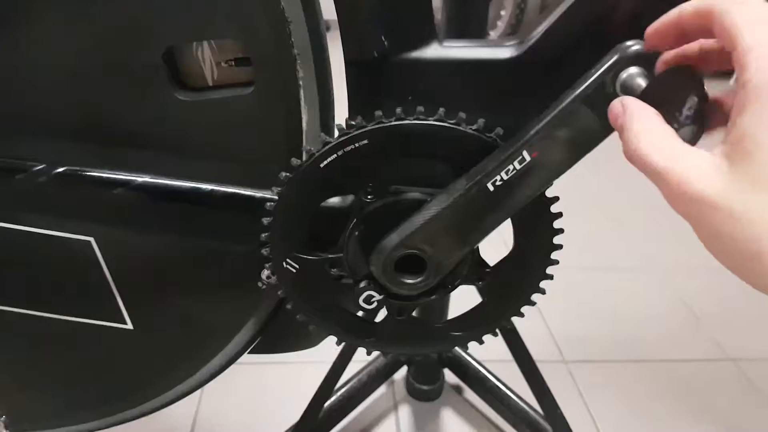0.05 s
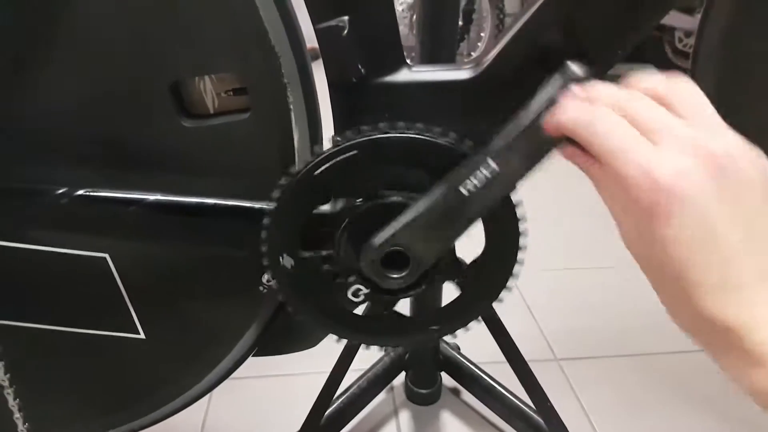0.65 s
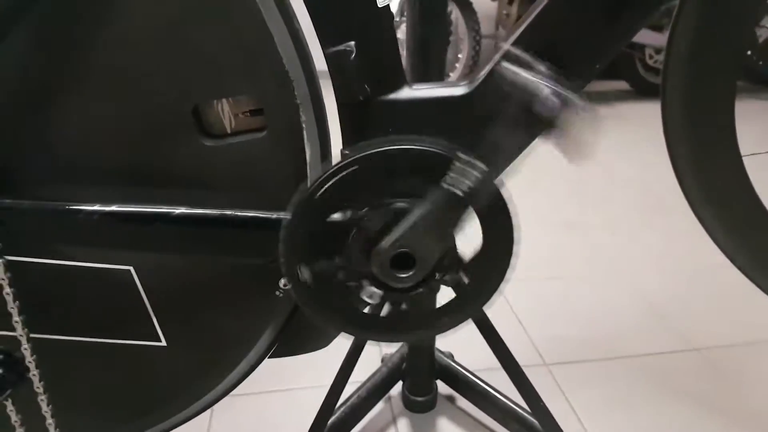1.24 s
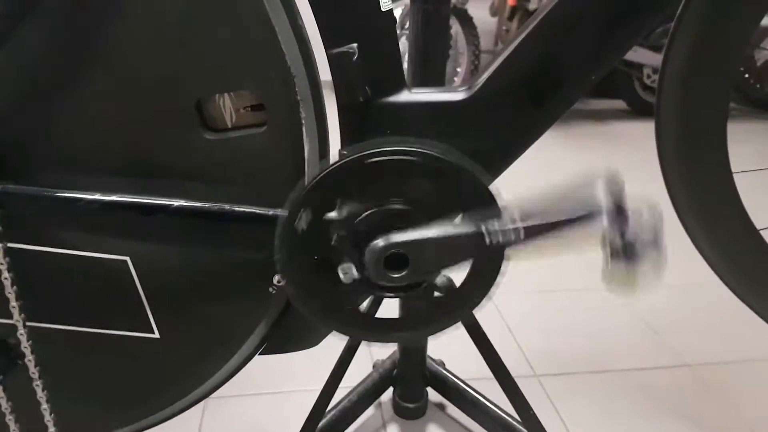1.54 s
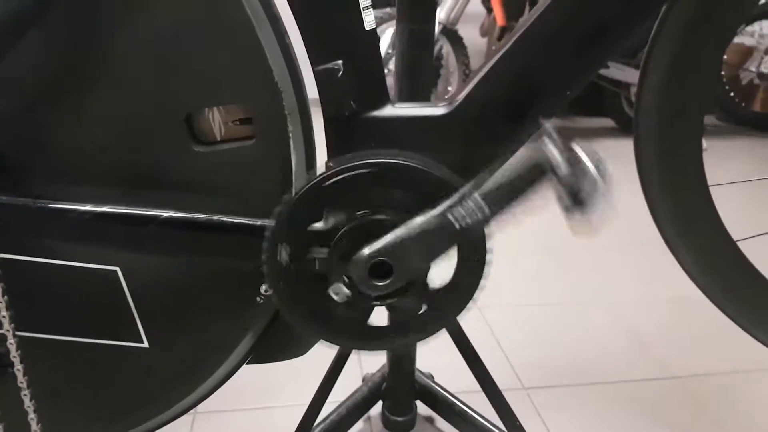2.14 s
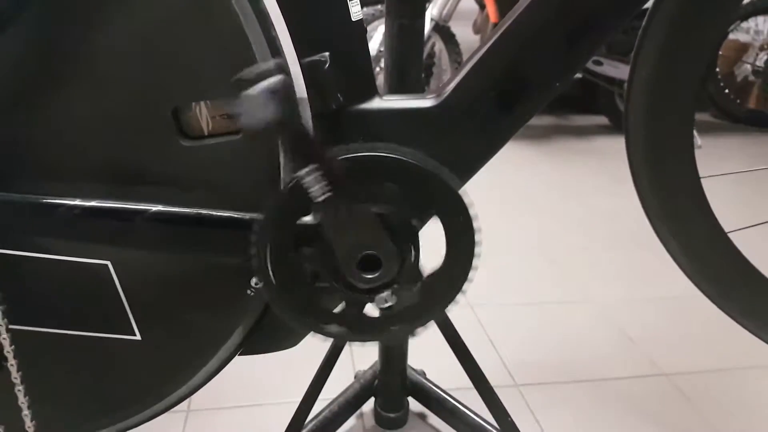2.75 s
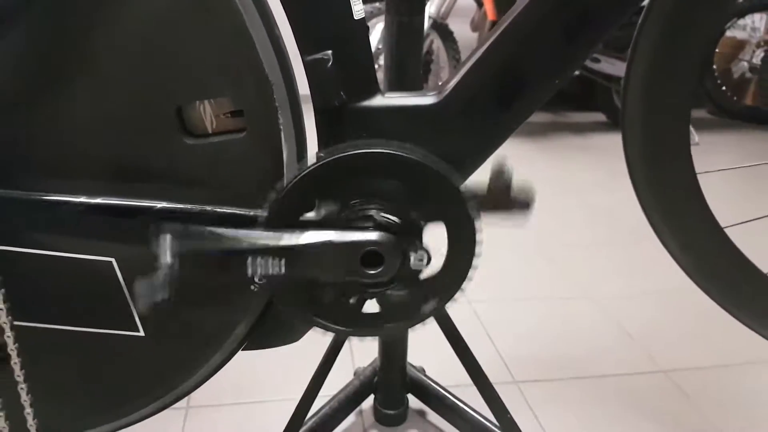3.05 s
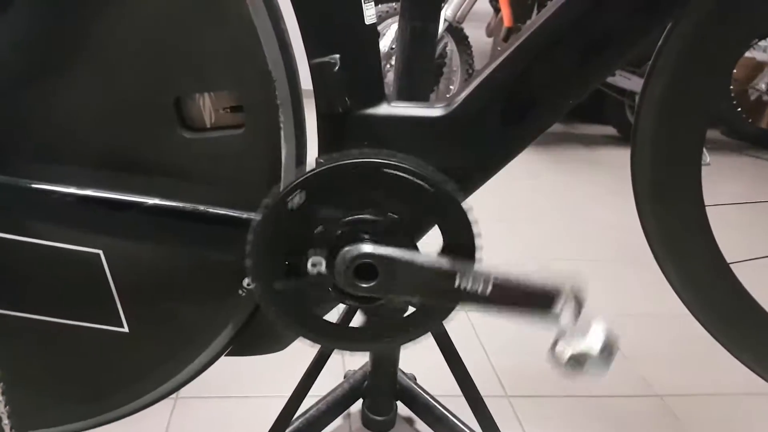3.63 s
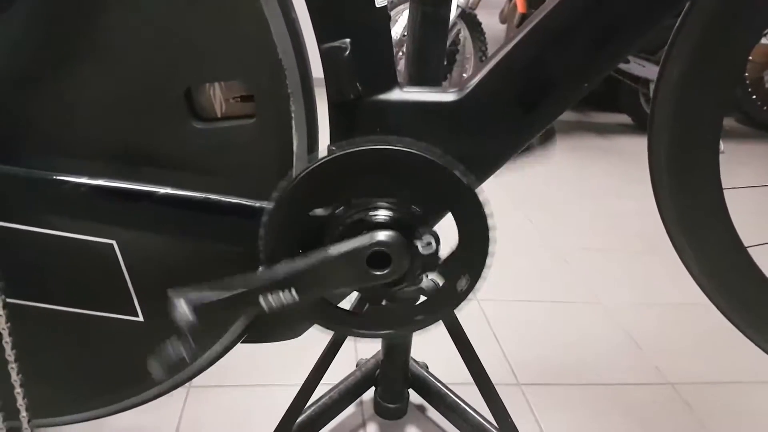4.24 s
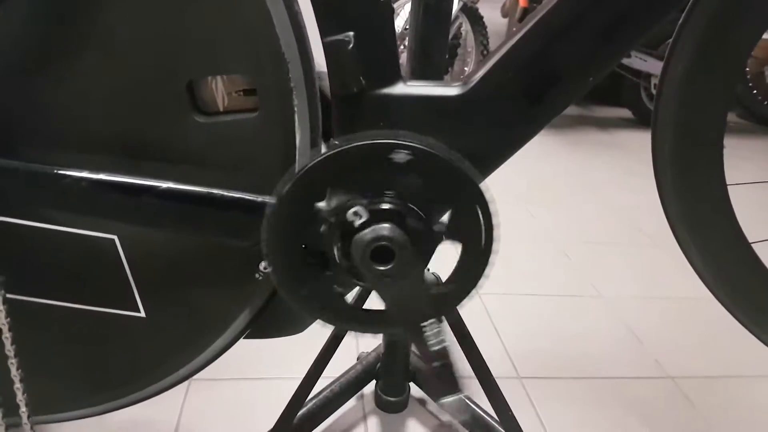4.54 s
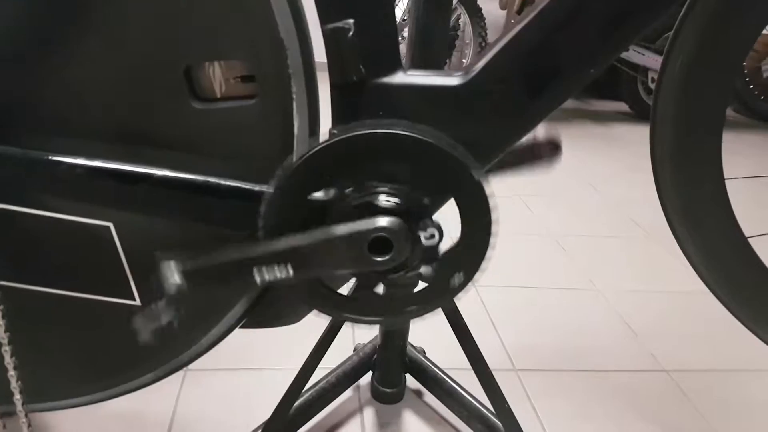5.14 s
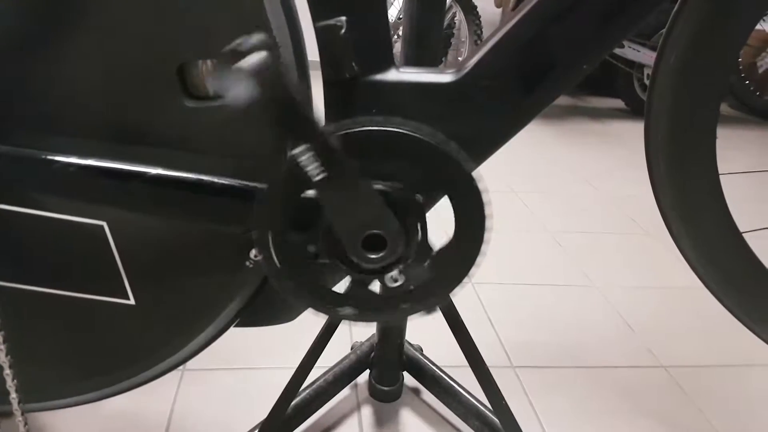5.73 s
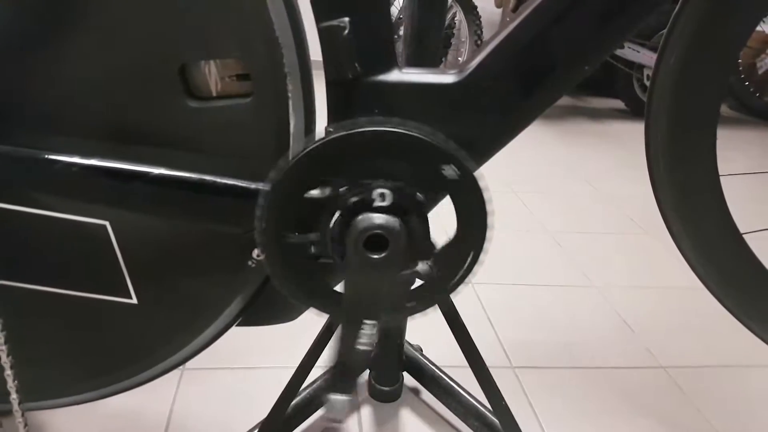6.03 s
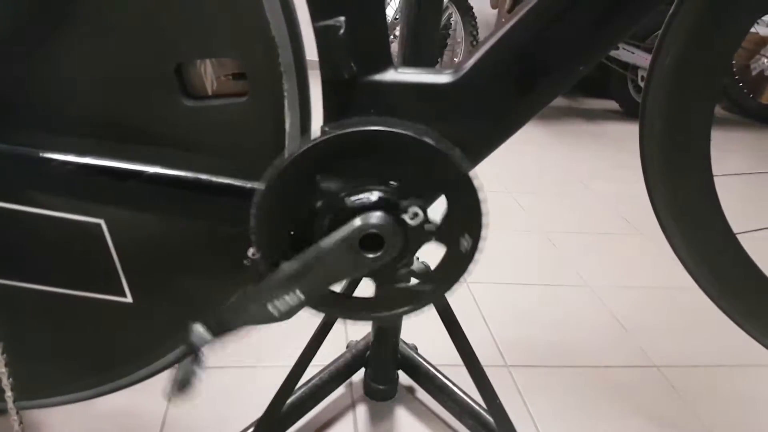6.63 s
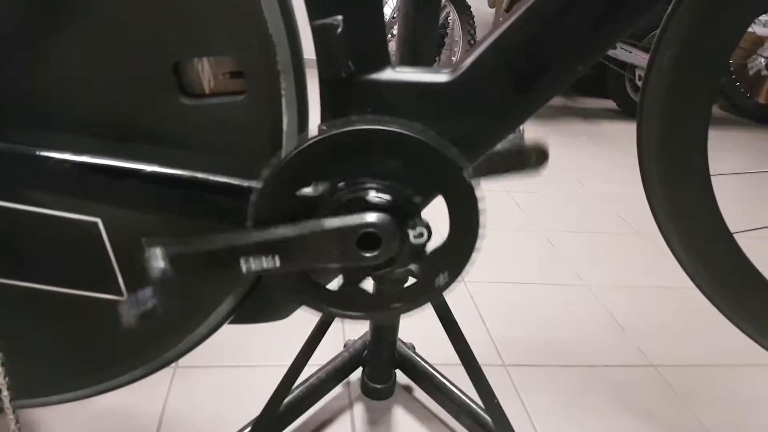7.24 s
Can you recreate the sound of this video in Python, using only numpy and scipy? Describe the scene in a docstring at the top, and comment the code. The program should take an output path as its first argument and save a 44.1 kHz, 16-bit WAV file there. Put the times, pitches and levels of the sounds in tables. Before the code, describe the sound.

After loud finger thumps on the microphone, a bicycle chain ticks, slaps and clatters as the crank coasts down to a gentle whirr.

```python
"""A bicycle chain runs on a stand in a tiled room: a hand flicks the crank, which spins on and slows.
Rollers tick over the teeth; the slack chain knocks, slaps and chatters about once a turn, and now and
then its links clack hard onto the teeth and ring the frame. Then it settles to a soft, swelling whirr.
A finger bumps the phone's right microphone port. Underneath lie mains hum, low rumble and faint hiss,
with a brief wash of noise at the start."""
import sys
import numpy as np
from scipy import signal
from scipy.fft import rfft, irfft
from scipy.io import wavfile
from scipy.ndimage import uniform_filter1d

SR = 44100
rng = np.random.default_rng(int(sys.argv[2]) if len(sys.argv) > 2 else 0)


def persist_wave(psi):
    """Save psi, clipped to +-1, as 16-bit WAV."""
    counts = np.round(np.clip(psi, -1, 1) * 32767).astype(np.int16)
    wavfile.write(sys.argv[1], SR, np.atleast_2d(counts).T)


N = 325458
T = np.arange(N) / SR
OPEN_S = .1  # the phone's input opens
RELEASE_S, TURNS_PER_S, HALF_SPEED_S = .85, 3.75, 5.556  # crank let go: when, how fast, time to halve


# tone of the running chain (frequency [Hz], level [dB])
RUN_EQ = [(100, -31), (160, -9.5), (250, 2.5), (400, -10), (650, 0), (900, -1.5), (1250, 2), (2000, -9.5),
          (2600, -5.5), (3500, -19), (6000, -25), (9000, -28.5), (15000, -33)]
# peaks in the tone of running chain, knocks and rattles (frequency [Hz], width [Hz], boost [dB])
SHARED_PEAKS = [(468, 31, 5.9), (743, 33, 3), (1020, 89, 2.5), (1216, 36, 2.64), (1450, 9.2, 1.6),
                (1710, 240, 6), (2050, 290, 5.4), (2650, 52, 3.3)]
# jolts that stir up the chain (time [s], level [dB], decay [s])
JOLT_CUES = [(.85, -49.5, 0.66), (2.7, -50.5, 0.47)]
def chain_run(steady_db=-55, flicker_db=1.77):
    """Rollers tick over chainring and pulleys while the chain is lively, louder after a jolt."""
    ticks = impacts(per_s=3000, scatter_db=4.5) * meshing(depth=0.27) * undb(flicker_db * drift(29.87))
    jolt_power = sum((undb(db) * burst(T - s, 0.0067, 0.064, decay_s)) ** 2
                     for s, db, decay_s in JOLT_CUES)
    level = np.sqrt(undb(steady_db) ** 2 + jolt_power)
    return unit(through(ticks, response(RUN_EQ, SHARED_PEAKS))) * level * liveliness()


# tone of the coasting drivetrain (frequency [Hz], level [dB])
WHIRR_EQ = [(150, -22), (250, 1.5), (420, -7), (660, -2.5), (770, -2), (1020, -4.5), (1350, -3.5),
            (1700, -8.5), (2600, -4.5), (3500, -21), (6000, -35), (11000, -42)]
# its resonances (frequency [Hz], width [Hz], boost [dB])
WHIRR_RESONANCES = [(759, 71, 3.5), (852, 143, 8), (1136, 80, 5.5), (1403, 350, 9), (1949, 92, 12.5),
                    (2230, 54, 6.5)]
def whirr(trough_db=-63.5, swell_db=7.5, start_turn=0.4, rise_turns=0.15, flicker_db=0.53):
    """The coasting drivetrain purrs softly; on each turn it swells quickly and sinks slowly."""
    ticks = impacts(per_s=3000, scatter_db=4.0) * meshing(depth=0.59)
    swell = np.interp((turns() - start_turn) % 1, [0, rise_turns, 1], [0, 1, 0])
    db = trough_db + swell_db * swell + flicker_db * drift(25)
    return unit(through(ticks, response(WHIRR_EQ, WHIRR_RESONANCES))) * spinning() * undb(db)


def turns():
    """Turns of the crank since its release; drag grows with the square of the speed."""
    return TURNS_PER_S * HALF_SPEED_S * np.log1p((T - RELEASE_S) / HALF_SPEED_S)


def meshing(depth, teeth=52):
    """Each roller seats on its chainring tooth: a slightly unsteady tremolo, one pulse per link."""
    teeth_passed = teeth * np.cumsum(np.gradient(turns()) * (1 + 0.0168 * drift(20)))
    return unit(1 + depth * np.cos(2 * np.pi * teeth_passed))


def spinning(rise_s=0.11):
    """Fade-in from 0 to 1 as the hand throws the crank."""
    return np.clip((T - RELEASE_S) / rise_s + 1, 0, 1)


def liveliness(calm_s=4.577, fade_db_per_s=48):
    """Envelope that holds at 1 while the chain is lively and dies away once it calms."""
    return spinning() * undb(-fade_db_per_s * np.maximum(T - calm_s, 0))


# tone of knocks and rattles (frequency [Hz], level [dB])
KNOCK_EQ = [(150, -38), (300, -28), (450, -8), (650, -6.5), (880, -10), (1100, 6), (1700, -0.5), (2400, -3),
            (2900, -11), (3400, -28.5), (4500, -31.5), (6500, -36), (9000, -54), (15000, -65)]
def knock(db, tilt_db):
    """One hollow-sounding contact of the slack chain, dull or bright."""
    ring = response(KNOCK_EQ, SHARED_PEAKS, tilt_db)
    return undb(db) * hit(ring, chatter=0.65, settle_s=0.0034)


# single chain knocks (time [s], level [dB], tilt [dB/octave])
KNOCK_CUES = [(.7998, -43.5, 1.5), (1.0324, -40, -0.5), (1.1214, -38, -1), (1.1431, -37, 0),
              (1.3085, -39, -2.5), (1.39, -40, -0.5), (1.461, -39.5, -5.5), (1.8081, -40, 7.5),
              (1.9932, -38.5, 7), (2.478, -40, -5), (2.7444, -38.5, 12.5), (3.8128, -39, 7.5),
              (4.0235, -37, 6), (4.2258, -42, 2.5), (4.4052, -31.5, 4.5), (4.4378, -42, -4.5)]
# chain slaps, about one a turn (time [s], level [dB], tilt [dB/octave], chatter level [dB])
SLAP_CUES = [(1.4258, -39.5, -6, -45.5), (1.945, -33, 2.5, -42.5), (2.2608, -35.5, 5.5, -43),
             (2.5746, -35, 3.5, -49), (2.906, -41, 5, -41.5), (3.271, -60, -3, -40.5),
             (3.447, -42.5, 7, -52), (3.6146, -39, 1.5, -39), (3.844, -50, -2, -44),
             (3.9718, -33, -2.5, -36), (4.201, -41.5, -6, -40.5), (4.578, -38, -2.5, -46.5),
             (4.9725, -52, -2, -68)]
def clatter(rebound_s=.05, rebound_db=-8, light_db=-59.5):
    """The slack chain knocks, and slaps with a chatter and one rebound; light taps fall at random."""
    knocks, chatter_level = np.zeros(N), np.zeros(N)
    chatter_shape = burst(T[:SR // 2], attack_s=0.0095, hold_until_s=0.048, decay_s=0.013)
    for s, db, tilt_db in KNOCK_CUES:
        add(knocks, s, knock(db, tilt_db))
    for s, db, tilt_db, chatter_db in SLAP_CUES:
        add(knocks, s, knock(db, tilt_db))
        add(knocks, s + rebound_s, knock(db + rebound_db, tilt_db))
        add(chatter_level, s, undb(chatter_db) * chatter_shape)
    links = chatter_level * impacts(per_s=1100, scatter_db=3.5) * meshing(depth=0.33)
    taps = undb(light_db) * liveliness() * impacts(per_s=20, scatter_db=2.5)
    return knocks + through(links + taps, response(KNOCK_EQ, SHARED_PEAKS, tilt_db=-2.0))


# hard metal clacks (time [s], level [dB], tilt [dB/octave], frame level [dB])
CLACK_CUES = [(.851, -39, 0.5, -66), (.884, -39, 1.5, -65), (.904, -32.5, -0.5, -54),
              (0.9751, -34, 3.5, -65), (1.1998, -31.5, -0.5, -61), (2.6902, -23, 1.5, -50),
              (2.968, -42.5, -2, -72), (3.058, -41, -.5, -67), (3.0927, -39, -1, -71)]
# tone of a clack (frequency [Hz], level [dB])
CLACK_EQ = [(150, -22), (420, -2.5), (700, 4.5), (1200, 3), (2200, 6.5), (3300, -5.5), (4200, -10),
            (5200, -12), (6400, -14.5), (9000, -19), (15000, -33)]
# the chainring's brief ping (frequency [Hz], width [Hz], boost [dB])
CHAINRING_PING = [(2770, 300, 2), (4200, 400, 2)]
# low modes of the frame on its stand (frequency [Hz], level [dB], time to fall 60 dB [s])
FRAME_MODES = [(208.2, 7, 0.12), (299.4, -1, 1), (582, 2, 0.25), (680, -22, 0.1), (652, 9.5, 0.2)]
def clacks(chatter, thump_hz=805, thump_width_hz=740, thump_db=16):
    """Links snap onto the teeth; the chainring pings and the jolt thumps in the frame and rings it."""
    out, t = np.zeros(N), T[:SR // 2]
    frame_ring = sum(undb(db - 60 * t / t60) * np.sin(2 * np.pi * hz * t) for hz, db, t60 in FRAME_MODES)
    soft_click = butter(1. * (t == 0), 1800, "low")
    hollow = signal.lfilter(*signal.iirpeak(thump_hz, thump_hz / thump_width_hz, SR), soft_click)
    for s, db, tilt_db, frame_db in CLACK_CUES:
        snap = hit(response(CLACK_EQ, CHAINRING_PING, tilt_db), chatter, settle_s=0.0042)
        thump = undb(thump_db) * hit(hollow, chatter=5, settle_s=0.0067)
        add(out, s, undb(db) * snap)
        add(out, s, undb(frame_db) * (frame_ring + thump))
    return out


def hit(ring, chatter, settle_s):
    """One contact, then the neighbouring links settle in quick small hits; rms 1 over the first 8 ms."""
    t = T[:len(ring)]
    links = rng.standard_normal(len(t)) * np.exp(-t / settle_s)
    sound = through((t == 0) + chatter * links / np.linalg.norm(links), ring)
    return sound / np.sqrt(np.mean(sound[t < .008] ** 2))


def hand(shove_s=.912, spread_s=.028, lead_s=0.035, slide_db=-54, shove_db=-41):
    """The fingers hiss over the pedal, then the shove thumps through the frame."""
    highs = butter(rng.standard_normal(N), 5000, "high")
    lows = butter(butter(rng.standard_normal(N), 250, "low"), 82, "high")
    slide = unit(highs) * np.exp(-((T - shove_s + lead_s) / spread_s) ** 2)
    shove = unit(lows) * np.exp(-((T - shove_s) / spread_s) ** 2)
    return undb(slide_db) * slide + undb(shove_db) * shove


# fingertip bumps on the microphone port (time [s], pressure step [dB])
BUMP_CUES = [(0.3845, -13), (0.5382, -6.5), (.617, -9), (0.6212, -2.5), (0.624, -8), (0.677, -38),
             (2.8107, -27)]
# fingernail ticks on the port (time [s], level of each push [dB])
NAIL_CUES = [(2.811, -11), (3.345, -31)]
def finger(leak_hz=85, damping=0.54, edge_hz=3600, flick_s=0.00023):
    """Each bump is a step of pressure that leaks out of the port; a nail flicks it out and back."""
    steps, ticks = np.zeros(N), np.zeros(N)
    for s, db in BUMP_CUES:
        add(steps, s, undb([db]))
    omega = 2 * np.pi * leak_hz
    leak = signal.bilinear([1, 0, 0], [1, 2 * damping * omega, omega ** 2], SR)  # high-pass
    thumps = butter(signal.lfilter(*leak, np.cumsum(steps)), edge_hz, "low")
    flick = response([(100, 18), (600, 5.0), (1600, 1.5), (3500, -9), (7000, -19.0), (15000, -18)])
    for s, db in NAIL_CUES:
        push = undb(db) * flick / np.abs(flick).max()
        add(ticks, s, -push)
        add(ticks, s + flick_s, push)
    return thumps + ticks


def room(x, early_db, tail_db, bounce_db, radiated=None):
    """Direct sound, a tile bounce, nearby scatter and a tail fed by what is radiated all round."""
    bounce_s, scatter_s, build_s = .00422, 0.007, 0.017
    low_t60_s, high_t60_s = 1.0, 0.45
    t = T[:SR]
    white = rng.standard_normal((3, SR))
    diffuse = butter(white[2], 925, "low") + butter(white[:2], 700, "high")  # the ports share the bass
    dull = butter(diffuse, 6600, "low", order=1)
    tail = dull * undb(-60 * t / low_t60_s) + (diffuse - dull) * undb(-60 * t / high_t60_s)
    tail *= np.minimum(t / build_s, 1)
    near = undb(early_db) * unit(diffuse * np.exp(-t / scatter_s)) / np.sqrt(SR)
    near[:, int(bounce_s * SR)] += undb(bounce_db + np.array([0, -4]))
    far = undb(tail_db) * unit(tail) / np.sqrt(SR)
    radiated = x if radiated is None else radiated
    walls = np.array([through(x, early) + through(radiated, late) for early, late in zip(near, far)])
    walls = butter(walls, 12000, "low", order=1)  # every reflection loses some treble
    direct = undb([[0], [-4.5]]) * x  # left, right
    return undb(-1.5) * (direct + walls)


# partials of the mains hum (frequency [Hz], relative level [dB])
HUM_PARTIALS = [(50, -12), (100, -4), (200, -3), (300, -14), (400, -17)]
# tone of the rumble (frequency [Hz], level [dB])
RUMBLE_EQ = [(25, -6), (60, -18), (85, -8), (105, 7.5), (140, -10.5), (180, -6), (240, 2.5), (310, -17),
             (400, -16), (700, -16), (2000, -54)]
# fader ride on hum and rumble together (time [s], gain [dB])
HUM_FADER = [(.1, -60), (1.4, -65), (5.4, -69.5), (5.98, -56), (7.38, -59.5)]
def mains_hum():
    """Mains hum over a wavering low rumble; both sink, then come back up near the end."""
    hum = sum(undb(db) * np.sin(2 * np.pi * (hz * T + rng.random())) for hz, db in HUM_PARTIALS)
    rumble = noise(RUMBLE_EQ) * undb(-6.0 + 0.5 * drift(4.2))
    return (hum + rumble) * undb(curve(HUM_FADER))


# tone of the hiss (frequency [Hz], level [dB])
HISS_EQ = [(100, 12.5), (700, 13.5), (1500, 13.5), (2300, 14.5), (3500, 5), (6000, 0.5), (10000, -5),
           (13000, -2.5), (15500, -2.5)]
def hiss(level_db=-65.0, rise_db=0.55):
    """A faint bed of hiss, separate on each port, that comes up a touch early on."""
    return np.array([noise(HISS_EQ) for _ in range(2)]) * undb(level_db + rise_db * np.clip(T - .5, 0, 1))


def wash(start_db=-59, decay_s=0.098):
    """A soft rush of noise with the tone of the clacks is already dying away as the input opens."""
    fade = undb(start_db) * np.exp(-np.maximum(T - OPEN_S, 0) / decay_s)
    return fade * np.array([noise(CLACK_EQ) for _ in range(2)])


def impacts(per_s, scatter_db):
    """Tiny impacts at random moments, pushing either way, of uneven size."""
    direction, size = rng.standard_normal((2, N))
    struck = rng.random(N) < per_s / SR
    return unit(struck * np.sign(direction) * undb(scatter_db * size))


def noise(eq):
    """Steady noise of a given tone."""
    return unit(through(rng.standard_normal(N), response(eq)))


def drift(rate_hz):
    """Smooth random modulation with a spread near 1."""
    hold = int(SR / rate_hz)
    steps = np.repeat(rng.standard_normal(N // hold + 1), hold)
    return 1.423 * uniform_filter1d(uniform_filter1d(steps, hold), hold)[:N]


def burst(t, attack_s, hold_until_s, decay_s):
    """Envelope: straight attack, hold, exponential decay."""
    return np.clip(t / attack_s, 0, 1) * np.exp(-np.maximum(t - hold_until_s, 0) / decay_s)


def response(eq, resonances=(), tilt_db=0, size=4096):
    """Unit-energy impulse response of an EQ curve with resonances and a tilt per octave."""
    f = np.maximum(np.arange(size // 2 + 1) * SR / size, 1)
    hz, db = np.transpose(eq)
    db = np.interp(np.log(f), np.log(hz), db) + tilt_db * np.log2(np.clip(f, hz[0], hz[-1]))
    for centre, width, boost in resonances:
        db += boost / (1 + (2 * (f - centre) / width) ** 2)
    cepstrum = irfft(np.log(undb(db)))
    cepstrum[size // 2:] = 0  # minimum phase: no ringing ahead of the hit
    ring = irfft(np.exp(rfft(2 * cepstrum)))
    return ring / np.linalg.norm(ring)


def through(x, ring):
    """Pass a sound through an impulse response."""
    return signal.oaconvolve(x, ring)[:len(x)]


def butter(x, hz, kind, order=2):
    """Plain low- or high-pass."""
    return signal.sosfilt(signal.butter(order, min(hz, .45 * SR), kind, fs=SR, output="sos"), x)


def undb(db):
    """Decibels to gain."""
    return 10 ** (np.asarray(db) / 20)


def unit(x):
    """Scale to rms 1."""
    return x / np.sqrt(np.mean(x ** 2))


def curve(rows):
    """Breakpoints (time [s], value) joined by straight lines."""
    return np.interp(T, *np.transpose(rows))


def add(track, s, sound):
    """Mix a sound into a track at a time."""
    i = int(s * SR)
    track[i:i + len(sound)] += sound[:N - i]


def scene():
    """The bicycle and the room at two ports; the right one faces away and loses some midrange."""
    running = room(chain_run() + whirr(), early_db=-3, tail_db=-3, bounce_db=-15)
    knocking = room(clatter(), early_db=-6, tail_db=-7.5, bounce_db=-6)
    # over all directions the chatter of a clack averages out: the tail gets one clean snap
    snapping = room(clacks(chatter=1.53), early_db=-5.5, tail_db=-5.0, bounce_db=-26,
                    radiated=clacks(chatter=0))
    shoving = room(hand(), early_db=-5, tail_db=-13, bounce_db=-16)
    left, right = running + knocking + snapping + shoving + mains_hum() + hiss() + wash()
    mid_scoop = response([(300, 9), (700, 7), (1300, 5), (2300, 0.5), (3500, 7), (8000, 4.5), (15000, 12)])
    return np.array([left, undb(1.12) * through(right, mid_scoop) + finger()])


def record(dry):
    """The phone opens its input after a moment and cuts the top above 16 kHz."""
    high_cut = signal.ellip(10, .2, 70, 16000, fs=SR, output="sos")
    return signal.sosfilt(high_cut, dry * (T > OPEN_S))


dry = scene()
out = record(dry)
persist_wave(out)
```